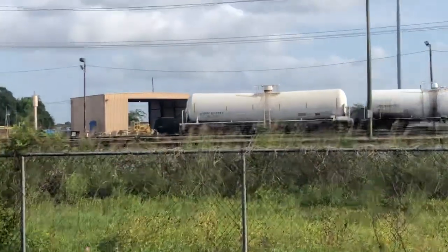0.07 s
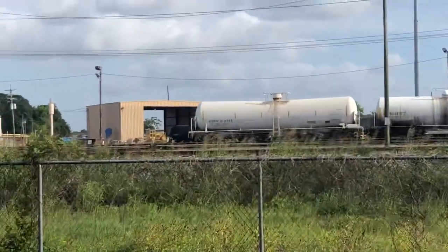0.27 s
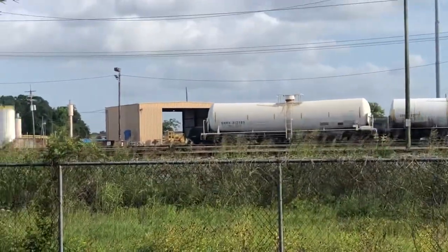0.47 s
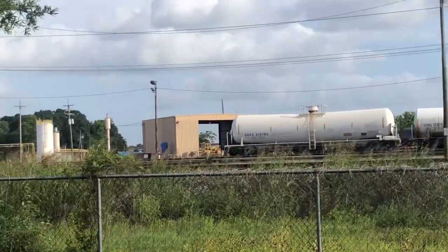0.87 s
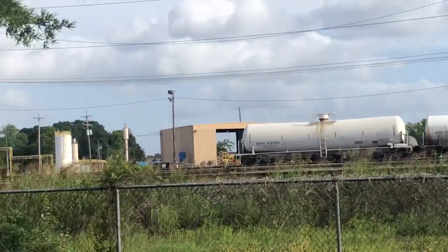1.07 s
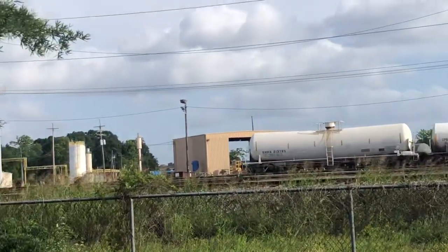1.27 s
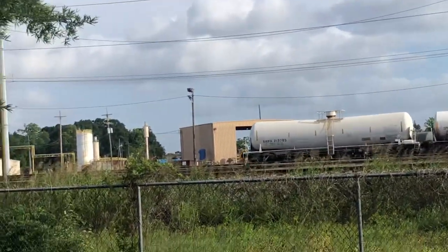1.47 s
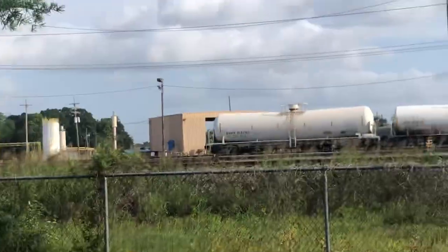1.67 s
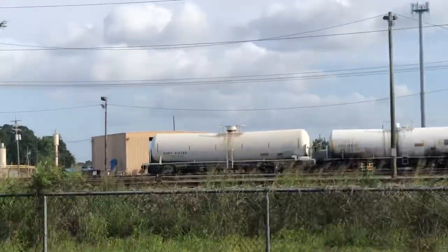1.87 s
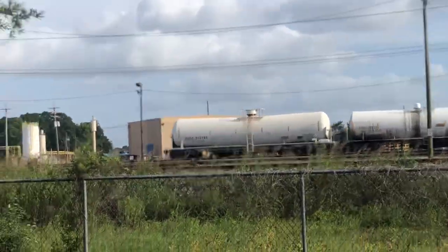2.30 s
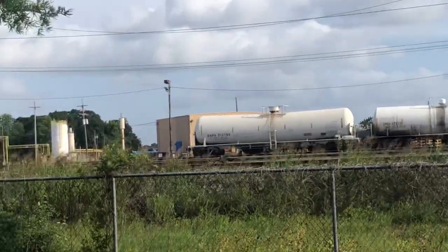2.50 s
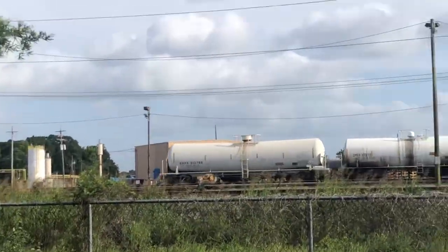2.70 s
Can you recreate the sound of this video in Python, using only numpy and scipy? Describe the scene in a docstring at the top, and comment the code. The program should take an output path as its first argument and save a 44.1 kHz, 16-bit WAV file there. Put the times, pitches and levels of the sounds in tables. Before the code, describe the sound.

Train wheels squeal and grind on steel, heard across a field. The scraping swells at about 0.5 seconds, with several high ringing tones taking turns, and dies away at 2 seconds. A second wheel gives a short, bright screech around 2.5 seconds, then fades. Wind buffets the microphone with low thumps, strongest from 0.3 to 0.9 seconds and near 1.9, over a faint rail yard rumble.

```python
"""Tank car wheels grind on steel, rolling slowly through a rail yard, heard from across a field.
Friction keeps many wheel modes singing over a scraping hiss; now one, now another locks into a squeal.
A second wheel scrapes briefly near the end. Close up, gusts buffet the microphone,
and the low rumble of the distant yard lies under it all."""
import sys
import numpy as np
from scipy import signal
from scipy.fft import rfft, irfft, next_fast_len
from scipy.io import wavfile
from scipy.ndimage import uniform_filter1d

SR = 44100
rng = np.random.default_rng(int(sys.argv[2]) if len(sys.argv) > 2 else 0)


def log_audio(samples):
    """Write samples as a 16-bit WAV file to the path given in sys.argv[1]."""
    # one column per channel
    frames = np.atleast_2d(samples).T
    # limit to full scale, then quantise
    limited = np.clip(frames, -1, 1)
    pcm = np.round(limited * 32767).astype(np.int16)
    wavfile.write(sys.argv[1], SR, pcm)


N = 125685


# How hard the first wheel rubs: time_s, level_db
FIRST_RUB = [(0, -11), (.06, -9), (.2, -13.5), (.4, -8), (.55, -1.5), (.8, 0.5), (1.13, 1), (1.35, 0.5),
             (1.55, -0.5), (1.7, 1.5), (1.8, -0.5), (1.92, -3.5), (1.99, -12.5), (2.08, -37), (2.3, -53),
             (2.85, -45)]
# Its modes, as they carry across the field: pitch_hz, level_db, width_hz
FIRST_MODES = [(1775, -50, 70), (2232, -47, 25), (2622, -54, 25), (2740, -50, 22), (3225, -53, 18),
               (3494, -52, 14), (3548, -53, 25), (3854, -52, 16), (4161, -55, 18), (4425, -48.5, 18),
               (4530, -52, 70), (5222, -52, 12), (5373, -50, 18), (5486, -53, 16), (6313, -47, 18),
               (6465, -52, 25), (7263, -48, 16), (8204, -53, 24), (9178, -51, 24), (10080, -50, 110),
               (3380, -53, 25), (5715, -56, 20), (5935, -55, 20), (10460, -56, 30), (11617, -58, 20),
               (12064, -56, 25), (12590, -61, 25), (13044, -58, 30), (13610, -60, 25)]
# Its scraping hiss: frequency_hz, density_db
FIRST_HISS = [(500, -6), (1000, -1.5), (1500, -2.5), (1900, 4.5), (2450, -2.5), (3200, 8.5), (4000, -1),
              (5000, 4.5), (6300, 2), (7600, 0), (8800, -3), (10500, -8), (12300, -2), (15500, -17)]
# Flares of its shrill ring near 11 kHz: time_s, level_db
SHRILL_FLARES = [(0, -45), (.06, -43), (.12, -42), (.2, -50), (.24, -41.5), (.28, -46), (.31, -39),
                 (.36, -49), (.41, -40), (.53, -43), (.56, -32), (.61, -29), (.68, -44), (.82, -41.5),
                 (.85, -32.5), (.95, -41.5), (1.13, -29.5), (1.18, -36), (1.24, -30.5), (1.29, -27),
                 (1.32, -35), (1.55, -40.5), (1.66, -32.5), (1.7, -21), (1.77, -34.5), (1.94, -41),
                 (2.02, -50.5), (2.85, -90)]
# The modes in that ring: pitch_hz, level_db, width_hz
SHRILL_RING = [(10734, -9, 16), (10987, -3, 18), (11080, -14, 70), (11400, -18, 50), (11935, -22, 35),
               (12430, -20, 40)]

def first_wheel():
    """The long grind: hiss and modes follow the rub, the shrill ring flares on its own."""
    grind = from_db(2.8) * singing(FIRST_MODES) + from_db(-34.1) * scrape(FIRST_HISS)
    shrill = from_db(in_time(SHRILL_FLARES)) * singing(SHRILL_RING)
    return from_db(in_time(FIRST_RUB)) * grind + shrill


def singing(modes, scatter=.6):
    """Friction keeps each mode ringing: a fluttering tone plus its scattered reflections."""
    out = 0
    for hz, db, width in modes:
        direct = tone(hz, wander_hz=width / 2) * rms_one(from_db(3.2 * drift(20.5)))
        reflected = narrow_noise(hz, width)
        out += from_db(db) * (np.sqrt(1 - scatter) * direct + np.sqrt(scatter) * reflected)
    return out


def scrape(spectrum, patchy_db=2, grain_db=.8):
    """Grainy hiss of steel on steel; as the contact shifts, one set of resonances gives way to another."""
    hisses = []
    for _ in range(2):
        _, bands = noise_bands(spectrum)
        hisses.append(rippled(sum(band * from_db(patchy_db * drift(27)) for band in bands)))
    shift = np.pi / 4 * (1 + np.tanh(2 * drift(2.9)))
    return (np.cos(shift) * hisses[0] + np.sin(shift) * hisses[1]) * from_db(grain_db * drift(60))


# Squeals that stand out of the grind: start_s, length_s, pitch_hz, level_db, roughness (0-1)
LOCKED_MODES = [(.035, .04, 2234, -50, .3), (.43, .05, 6314, -43, .2), (.43, .11, 8204, -50, .2),
                (.64, .06, 4540, -44, .4), (.69, .12, 8204, -46, .3), (.72, .14, 3535, -40, .5),
                (.77, .13, 4565, -42, .3), (.77, .18, 6490, -45, .4), (.855, .04, 2232, -37, .2),
                (.86, .06, 10734, -42, .3), (.95, .05, 3494, -34.5, .1), (.96, .045, 3855, -37, .1),
                (.93, .15, 8204, -46, .3), (.99, .4, 2230, -47, .5), (1.01, .09, 6312, -37.5, .2),
                (1.05, .07, 3225, -41, .3), (1.06, .05, 3570, -39, .5), (1.07, .08, 3854, -42, .3),
                (1.06, .1, 6842, -47, .2), (1.09, .08, 2725, -38, .5), (1.14, .06, 6312, -40, .3),
                (1.17, .15, 9178, -48, .4), (1.21, .09, 10040, -44, .8), (1.26, .14, 5222, -48, .3),
                (1.28, .28, 5372, -37.5, .2), (1.25, .27, 3494, -33.5, .1), (1.52, .11, 2738, -38, .3),
                (1.6, .08, 3493, -31.5, .1), (1.63, .1, 3856, -40, .15), (1.67, .07, 5370, -39, .2),
                (1.68, .07, 10734, -35, .2), (1.72, .16, 2628, -41, .4), (1.78, .09, 3493, -44, .3),
                (1.86, .07, 4428, -43, .4), (1.88, .1, 2742, -47, .2), (1.98, .09, 2740, -54, .2),
                (1.98, .12, 4440, -56, .4), (2.0, .17, 5255, -57, .3)]

def squeals(flutter_db=1.5):
    """Single modes lock, hold and ring away; the rougher the contact, the more the tone breaks up."""
    out = 0
    for start, length, hz, db, rough in LOCKED_MODES:
        pure = np.sqrt(1 - rough) * tone(hz, wander_hz=5)
        broken = np.sqrt(rough) * narrow_noise(hz, width_hz=20)
        envelope = held(start, length, attack_s=.0073, t60_s=.4)
        out += envelope * from_db(db + flutter_db * drift(32)) * (pure + broken)
    return out


# Squeaks from the track: middle_s, length_s, pitch_hz, width_hz, level_db
SLIPS = [(1.165, 0.12, 1798, 70, -38), (1.73, 0.024, 5970, 70, -30)]

def squeaks():
    """Steel slips with a short, rough squeak."""
    return sum(noisy_swell(*row) for row in SLIPS)


# How hard the second wheel rubs: time_s, level_db
SECOND_WHEEL_RUB = [(0, -60), (2.17, -45), (2.21, -37), (2.29, -23), (2.34, -16), (2.432, -13.5),
                    (2.465, -4.5), (2.51, 1.5), (2.585, -7.5), (2.62, -7), (2.68, -11), (2.85, -20)]
# Its modes: pitch_hz, level_db, width_hz
SECOND_WHEEL_MODES = [(1756, -51, 29), (2210, -48, 50), (2630, -42, 25), (3545, -41, 20), (4500, -44, 35),
                      (5450, -47, 22), (6440, -44, 22), (7130, -51, 25), (7390, -46, 28), (7630, -50, 25),
                      (7850, -50, 28), (8378, -44, 20), (9370, -52, 25), (10900, -43, 25), (11075, -39, 35),
                      (11205, -39, 25), (11720, -44, 90), (12870, -49, 60)]
# Its scraping hiss: frequency_hz, density_db
SECOND_HISS = [(500, -31), (1500, -9), (3000, 3.5), (5500, 1), (8000, -4), (9500, -6), (11500, 5),
               (13000, -3), (15500, -17)]

def second_wheel():
    """A short scrape sets slightly different modes singing."""
    grind = singing(SECOND_WHEEL_MODES) + from_db(-33.6) * scrape(SECOND_HISS)
    return from_db(in_time(SECOND_WHEEL_RUB)) * grind


# The second wheel catches: start_s, level_db
PINGS = [(2.204, -47.5), (2.324, -41.5), (2.433, -32.5)]
# What each ping rings with: pitch_hz, level_db, width_hz
PING_MODES = [(11100, -5, 57), (11340, -14, 36), (11400, -4, 120), (11230, -4, 360), (12600, -7, 230)]

def catches(t60_s=.63):
    """Each catch is a bright ping that starts at once and rings away in the highest modes."""
    t = np.arange(N) / SR
    envelope = sum((t >= s) * from_db(db - 60 * np.maximum(t - s, 0) / t60_s) for s, db in PINGS)
    return envelope * sum(from_db(db) * narrow_noise(hz, width) for hz, db, width in PING_MODES)


# The second wheel bites: start_s, level_db
RASPS = [(2.203, -46.5), (2.44, -34.5), (2.606, -37)]

def bites(attack_s=.0066):
    """Each bite is a harsh burst of scraping that starts sharply and dies away."""
    band = signal.butter(2, [2060, 5360], "band", fs=SR, output="sos")
    rasp = rms_one(rippled(signal.sosfilt(band, rng.standard_normal(N))))
    return rasp * sum(from_db(db) * held(s, attack_s, attack_s, t60_s=.19) for s, db in RASPS)


# Gusts at the microphone: time_s, strength_db
GUSTS = [(0, -15.5), (.2, -37), (.29, -8.5), (.38, -1), (.56, -7.5), (.63, 1), (.69, -6.5), (.76, 4),
         (.87, -2.5), (.96, -22), (1.1, -21), (1.31, -15), (1.39, -15), (1.65, -19.5), (1.72, -9),
         (1.81, -12), (1.88, 7.5), (1.93, -7), (2.0, -1.5), (2.14, -15.5), (2.22, -21), (2.85, -33)]
# Single eddies that hit it: middle_s, length_s, strength_db, tilt_db_per_octave
EDDIES = [(0.134, 0.016, -10, 12), (0.226, 0.019, -5, 4.5), (0.283, 0.0096, 3, -6.5),
          (0.333, 0.0071, -8, 4), (0.355, 0.031, 3.5, 0.5), (0.456, 0.0074, -2.5, -11.5),
          (0.519, 0.035, 1.5, -5), (0.616, 0.022, 10, -3), (0.65, 0.01, 6.5, -1.5),
          (0.723, 0.0093, 8.5, 2.5), (0.73, 0.018, 11, -2.5), (0.78, 0.0067, -1, 1),
          (0.796, 0.01, 7.5, -5.5), (0.853, 0.0034, 14, -4), (0.876, 0.0075, 5, -5),
          (0.918, 0.023, -1.5, -0.5), (0.996, 0.0096, 3, 1), (1.027, 0.0098, 6, 1.5),
          (1.08, 0.014, -2.5, 4.5), (1.159, 0.0067, 5, 1.5), (1.203, 0.037, -2, 3),
          (1.26, 0.035, -6.5, -1.5), (1.32, 0.025, 1, -3), (1.436, 0.0095, -12, -10),
          (1.585, 0.026, 2.5, -0.5), (1.69, 0.0064, 3, 0.5), (1.707, 0.0095, 2, 1),
          (1.773, 0.019, 0.5, -6.5), (1.842, 0.0071, 10, 2), (1.856, 0.0099, 11, -6), (1.88, 0.012, -1, 1),
          (1.944, 0.005, 5.5, -1), (1.973, .005, 11.5, -7.5), (1.982, 0.015, 11, 0.5),
          (2.007, 0.016, -0.5, 0), (2.057, .012, -5, 3), (2.081, 0.0065, 1.5, 0),
          (2.114, 0.017, -2.5, -1.5), (2.14, 0.0056, -1, -4), (2.466, 0.032, -11.5, 0)]
# Wind noise at strength 0 dB: frequency_hz, density_db
WIND_SPECTRUM = [(25, -30), (45, -4.5), (80, -6), (170, -0.5), (300, -3.5), (500, -3), (700, -13.5),
                 (1000, -23.5), (1500, -43.5), (2200, -85), (4000, -79), (12000, -110)]
# The treble swells more than the bass: frequency_hz, growth_db_per_db
GUST_GROWTH = [(40, .5), (150, 0.58), (400, 1.0), (900, 1.15), (1800, 2.5)]

def wind(tilt_pivot_hz=436, turbulence_db=4.5):
    """Turbulence on the microphone: the stronger the eddy, the louder and brighter."""
    centres, bands = noise_bands(WIND_SPECTRUM)
    octaves = np.clip(np.log2(centres / tilt_pivot_hz), -2, 2)
    eddy_shapes = np.array([swell(middle, length) ** 2 for middle, length, _, _ in EDDIES])
    eddy_spectra = np.transpose([from_db(db + tilt * octaves) ** 2 for _, _, db, tilt in EDDIES])
    power = from_db(in_time(GUSTS)) ** 2 + eddy_spectra @ eddy_shapes
    strength_db = 10 * np.log10(power) + turbulence_db * np.clip(drift(64.4), -2, 1)
    band_gains = from_db(at_hz(GUST_GROWTH, centres)[:, None] * strength_db)
    return from_db(-23.5) * np.sum(bands * band_gains, axis=0)


# Pops right on the microphone port: time_s, peak_db
PORT_POPS = [(.277, -25.5), (0.356, -10.5), (.397, -27), (.45, -20), (.531, -18.5), (.633, -14),
             (0.65, -25), (0.72, -8.5), (.732, -15), (0.774, -17), (.811, -23), (.851, -15), (1.025, -19.5),
             (1.704, -25), (1.767, -18.5), (1.847, -6), (1.879, -12), (1.885, -11.5), (1.951, -13.5),
             (1.971, -10.5), (1.98, -18), (2.078, -29)]

def pops():
    """The sharpest eddies give dull pressure kicks of either sign."""
    port = signal.butter(3, [302, 963], "band", fs=SR, output="sos")
    kicks = np.zeros(N)
    for s, db in PORT_POPS:
        kicks[int(s * SR)] = from_db(db) * rng.choice([-1, 1])
    unit_peak = np.abs(signal.sosfilt(port, signal.unit_impulse(SR // 20))).max()
    return signal.sosfilt(port, kicks + 1e-18) / unit_peak


# Slow eddies at the microphone: middle_s, length_s, pitch_hz, width_hz, level_db
SLOW_EDDIES = [(0.234, 0.032, 75.3, 40, -27), (0.548, .025, 90.9, 40, -27.5),
               (1.474, 0.032, 76.1, 40, -28.5), (1.73, 0.035, 85, 40, -27)]

def thumps():
    """Broad, slow eddies thump in the bass."""
    return sum(noisy_swell(*row) for row in SLOW_EDDIES)


# Drones over in the yard: middle_s, length_s, pitch_hz, width_hz, level_db
YARD_DRONES = [(0.034, 0.047, 147.6, 30, -33), (2.78, 0.19, 259, 11, -39.5)]

def drones():
    """A low drone comes and goes."""
    return sum(noisy_swell(*row) for row in YARD_DRONES)


# The yard from across the field: frequency_hz, density_db
YARD_RUMBLE = [(25, -30), (40, -50), (60, 4.5), (100, 0), (160, 0.5), (260, -6), (400, -27.5), (700, -15),
               (1200, -20), (2500, -24.5), (5000, -29.5), (9000, -36), (15000, -35)]

def yard():
    """Steady distant rumble of the yard and the rolling cars."""
    _, bands = noise_bands(YARD_RUMBLE)
    return from_db(-35) * bands.sum(axis=0)


def from_db(db):
    """Decibels to gain."""
    return 10 ** (np.asarray(db) / 20)


def rms_one(x):
    """Scale to rms 1."""
    return x / np.sqrt(np.mean(x ** 2) + 1e-20)


def in_time(rows):
    """Join (time_s, value) rows by straight lines."""
    return np.interp(np.arange(N) / SR, *np.transpose(rows))


def at_hz(rows, hz):
    """Read (frequency_hz, value) rows on a log-frequency axis."""
    frequencies, values = np.transpose(rows)
    return np.interp(np.log(hz), np.log(frequencies), values)


def drift(rate_hz):
    """Smooth random motion of spread 1."""
    pole = np.exp(-40 * np.pi * rate_hz / SR)  # one step every 20 samples
    white = rng.standard_normal(N // 20 + 2002)
    slow = signal.lfilter([1], [1, -2 * pole, pole * pole], white)[2000:]
    return np.interp(np.arange(N) / 20, np.arange(len(slow)), rms_one(slow))


def swell(middle_s, length_s):
    """A bell of height 1, above half power for the given length."""
    return 2 ** (-2 * np.minimum(((np.arange(N) / SR - middle_s) / length_s) ** 2, 20))


def held(start_s, length_s, attack_s, t60_s):
    """Rise, hold, then ring away."""
    t = np.arange(N) / SR - start_s
    return np.clip(t / attack_s, 0, 1) * from_db(-60 * np.clip((t - length_s) / t60_s, 0, 3))


def tone(hz, wander_hz):
    """A sine of rms 1 whose pitch wanders a little."""
    cycles = np.cumsum(hz + wander_hz * drift(18.4)) / SR
    return np.sqrt(2) * np.sin(2 * np.pi * (cycles + rng.random()))


def narrow_noise(hz, width_hz):
    """Noise of rms 1 gathered round one frequency."""
    phase = 2 * np.pi * hz * np.arange(N) / SR
    return drift(width_hz) * np.cos(phase) + drift(width_hz) * np.sin(phase)


def noisy_swell(middle_s, length_s, hz, width_hz, db):
    """A narrow band of noise that rises and fades."""
    return from_db(db) * swell(middle_s, length_s) * narrow_noise(hz, width_hz)


def noise_bands(spectrum):
    """Noise in third-octave bands that sum to rms 1: returns centres_hz, bands."""
    edges = np.geomspace(22, 17000, 29)
    centres = np.sqrt(edges[1:] * edges[:-1])
    white = rng.standard_normal((2, N + SR // 4))
    bands = np.zeros((len(centres), N))
    for k, hz in enumerate(centres):
        bandpass = signal.butter(3, edges[k:k + 2], "band", fs=SR, output="sos")
        bands[k] = from_db(at_hz(spectrum, hz)) * signal.sosfilt(bandpass, white[k % 2])[-N:]
    return centres, bands / np.std(bands.sum(axis=0))


def rippled(x, depth_db=4.5, spacing_hz=109.83):
    """Pass a sound through a dense, random set of weak resonances."""
    size, steps = next_fast_len(N), rng.standard_normal(1000)
    bumps = steps - uniform_filter1d(steps, size=5)
    ripple = np.interp(np.fft.rfftfreq(size, 1 / SR), np.arange(len(bumps)) * spacing_hz / 2, bumps)
    gain = from_db(depth_db * np.minimum(rms_one(ripple), 2))
    return irfft(rfft(x, size) * rms_one(gain), size)[:N]


def scene():
    """Distant wheels and yard, with the wind right on the one microphone."""
    wheels = first_wheel() + squeals() + squeaks() + second_wheel() + catches() + bites()
    gusts = wind() + pops() + thumps()
    return (wheels + yard() + drones() + gusts)[None]


def record(dry, low_cut_hz=48, ceiling=.75, high_cut_hz=15800):
    """The deepest bass is cut, the strongest peaks are rounded, the top is cut."""
    thinned = signal.sosfilt(signal.butter(2, low_cut_hz, "high", fs=SR, output="sos"), dry)
    rounded = ceiling * np.tanh(thinned / ceiling)
    return signal.sosfilt(signal.ellip(10, .1, 80, high_cut_hz, fs=SR, output="sos"), rounded)


dry = scene()
out = record(dry)
log_audio(out)
```